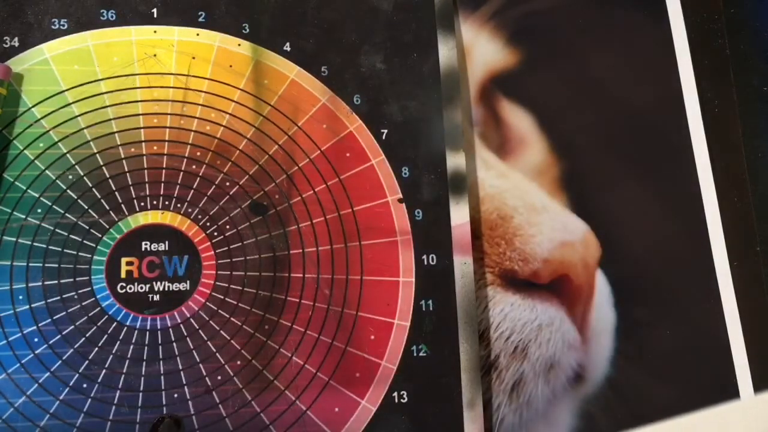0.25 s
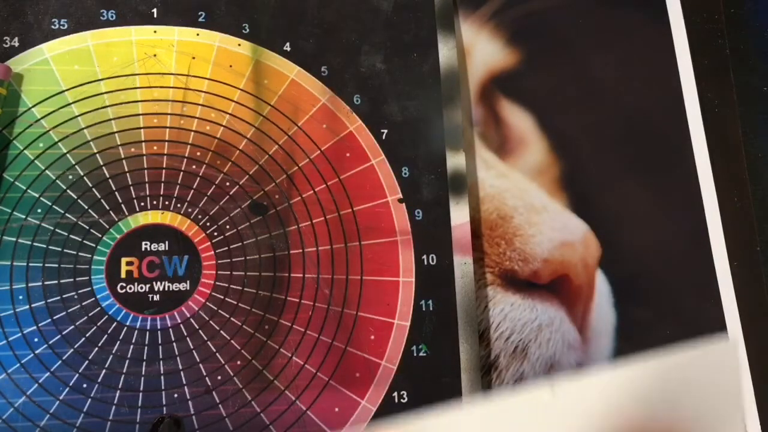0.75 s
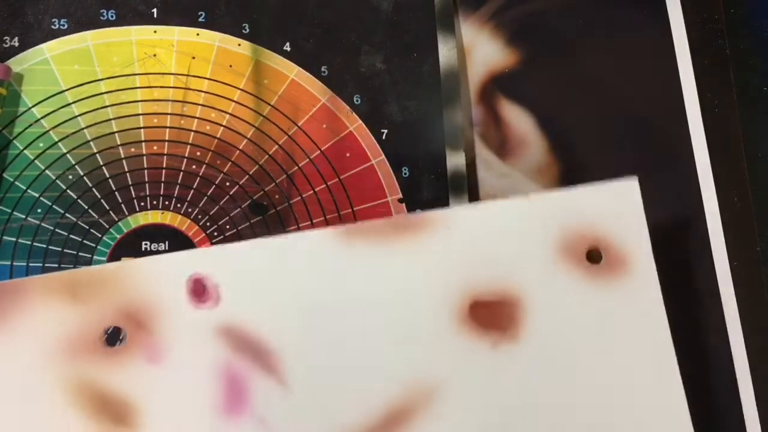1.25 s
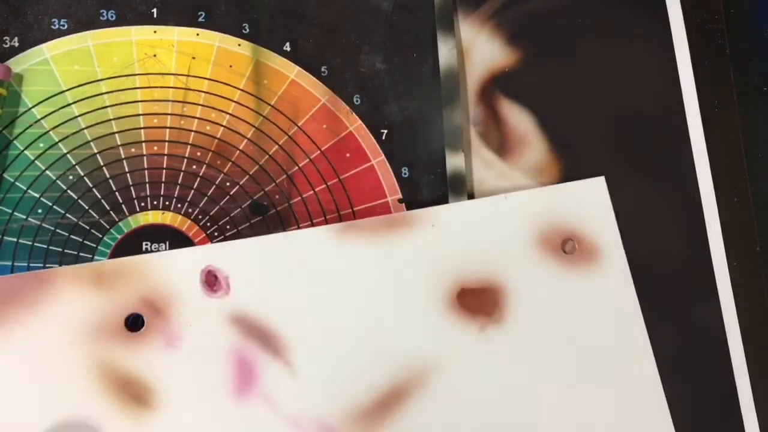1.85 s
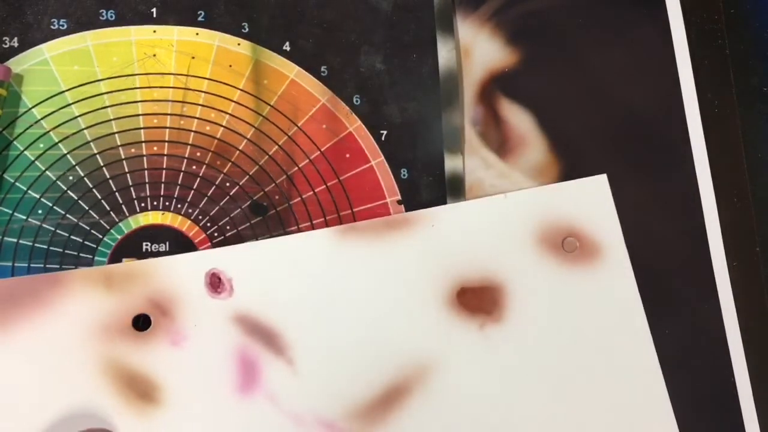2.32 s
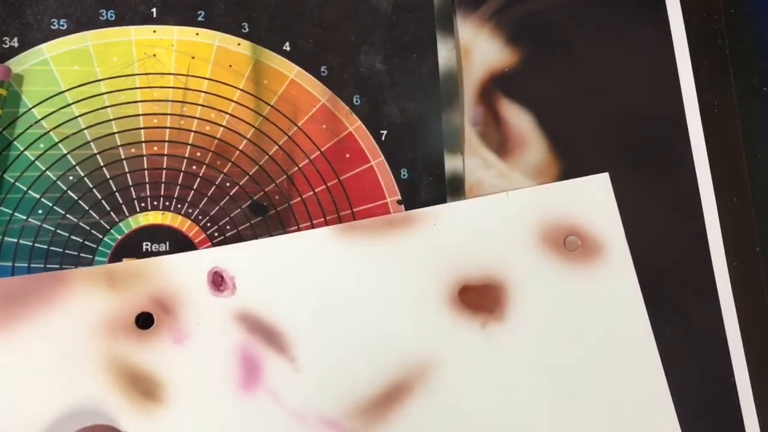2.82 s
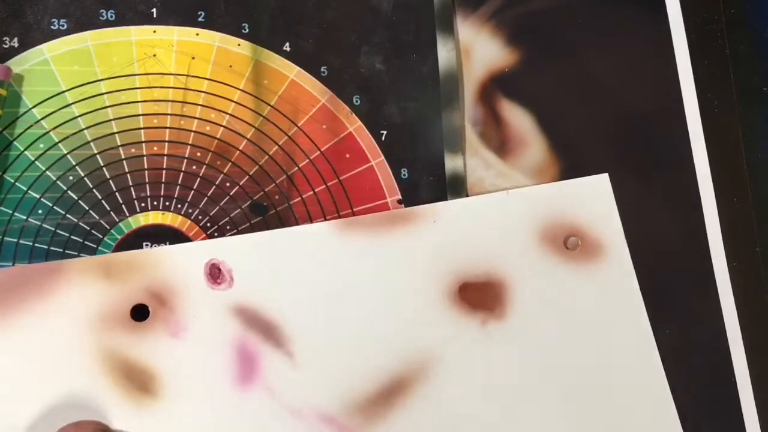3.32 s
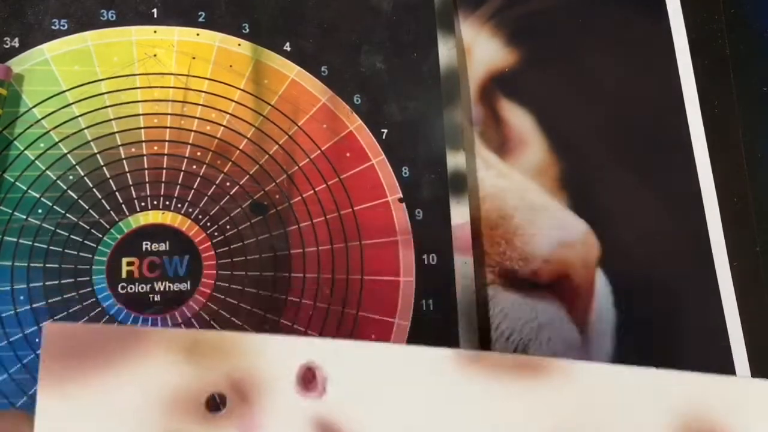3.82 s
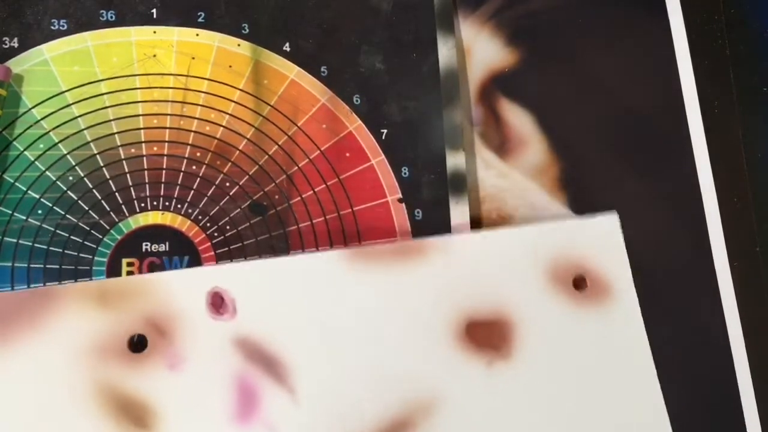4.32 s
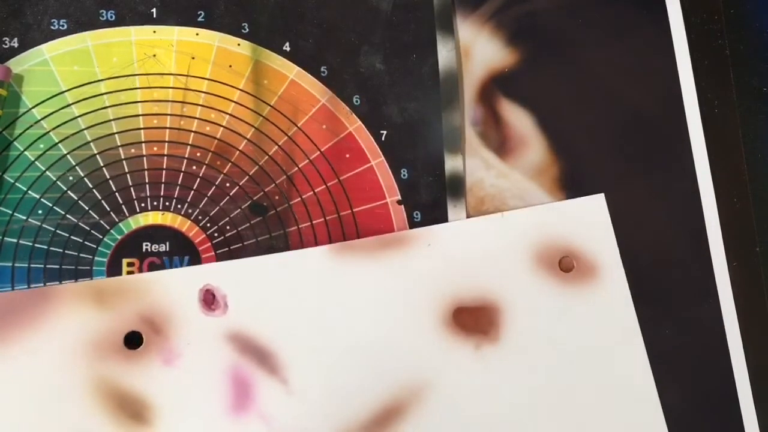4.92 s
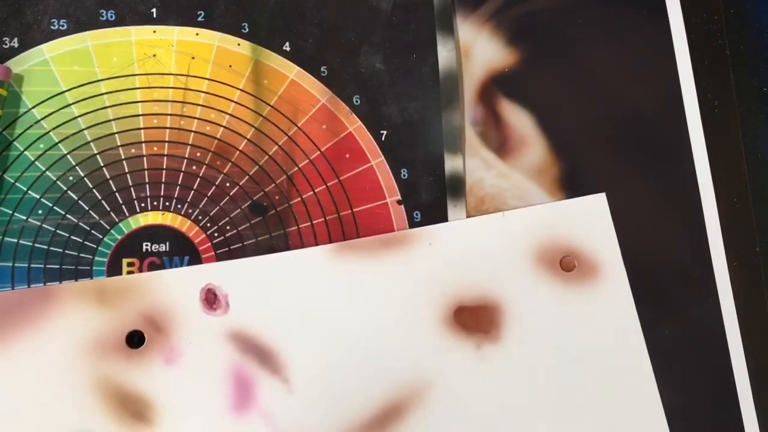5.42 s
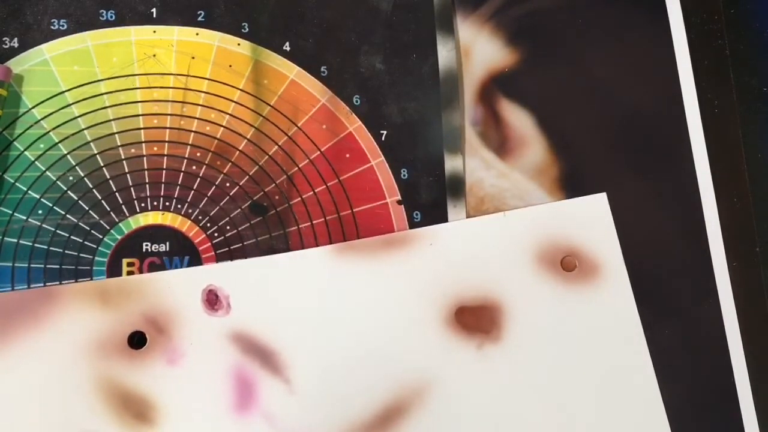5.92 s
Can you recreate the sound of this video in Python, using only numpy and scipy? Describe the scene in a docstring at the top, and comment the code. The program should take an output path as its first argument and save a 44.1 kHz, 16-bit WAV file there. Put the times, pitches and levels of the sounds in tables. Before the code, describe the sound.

An airbrush is already spraying at the start, close to the microphone, its jet rushing against a card with a fine, high hiss on top. At about 0.6 seconds it is drawn away and the rushing drops out, leaving the thin hiss, which slowly weakens and shuts off around 1.7 seconds. At about 0.85 seconds the card knocks lightly on a board with a short scrape. From 2 to 3.5 seconds there are only faint, dry paper ticks and finger scuffs as the card is held. Between 3.6 and 3.9 seconds comes a quick cluster of light taps, clicks and scrapes against the board, strongest near 3.8. Two soft, short scrapes follow around 4.3 to 4.5 seconds, then sparse faint ticks until the end at about 6 seconds. The room is quiet and fairly dry, with a faint low rumble throughout.

```python
"""A quiet room with a low rumble. An airbrush jet roars on a nearby surface, is drawn away and hisses
in free air until the trigger shuts. A paper card is then handled: scrapes from sliding friction,
dry paper ticks, finger scuffs and taps that ring a board.
One microphone feeds both channels."""
import sys
import numpy as np
from scipy import signal
from scipy.fft import rfft, irfft, next_fast_len
from scipy.io import wavfile
from scipy.ndimage import uniform_filter1d, map_coordinates

SR = 44100
rng = np.random.default_rng(int(sys.argv[2]) if len(sys.argv) > 2 else 0)


def wav_out(sig):
    """Save sig, one row per channel (or a flat mono array), as 16-bit PCM at SR to the path in sys.argv[1]."""
    wavfile.write(sys.argv[1], SR, np.round(np.clip(np.atleast_2d(sig).T, -1, 1) * 32767).astype(np.int16))


N = 271523
T = np.arange(N) / SR
FRAME_HZ, FRAME_S = np.fft.rfftfreq(1024, 1 / SR), np.arange(N // 256 + 5) * 256 / SR
EVENT_N = 4000
EVENT_S = np.arange(EVENT_N) / SR

# low and high drone: f/Hz, rms waver/Hz
DRONES = [(38.5, 0.9), (58.5, 1.6)]
# low drone: t/s, level/dB
LOW_DRONE_LEVEL = [(0, -48), (.15, -66), (2.1, -63), (2.35, -48.5), (4.6, -50), (6.16, -55)]
# high drone: centre/s, width/s, rise/dB
HIGH_DRONE_SWELLS = [(.3, 0.26, 11), (1.6, 0.39, 9.5), (2.1, 0.64, 4.5), (2.7, .6, 8.5), (3.95, 0.5, 10.5),
                     (5.14, 0.39, 10.5), (5.85, 0.26, 11.5)]
# room resonances: f/Hz, width/Hz, gain/dB
ROOM_MODES = [(50.3, 8.9, -4.5), (91, 21, 1), (107.94, 12, -5), (130.5, 18, -9), (153.6, 15, -3),
              (187.4, 18, -2), (200, 5.2, -3.5), (237.5, 16, -8), (264.5, 23, -15), (296, 82, -23.5),
              (358, 15, -23.5), (545, 100, -27)]
# rumble: t/s, level/dB
RUMBLE_LEVEL = [(0, -53.5), (.58, -55), (.76, -46.5), (1.0, -52), (2.1, -49.5), (2.9, -46.5), (3.4, -48.5),
                (3.8, -46), (4.5, -47.5), (5.4, -48), (5.85, -57), (6.16, -55.5)]
# dull wash: f/Hz, density/dB
WASH_COLOUR = [(200, -17), (330, 3), (550, -1.5), (800, -8.5), (1100, -8), (2000, -28), (4000, -34),
               (15600, -60)]
# wash: t/s, level/dB
WASH_LEVEL = [(.9, -63), (1.8, -68), (3.7, -65), (5.2, -69.5), (6.16, -70.5)]
# wash: centre/s, width/s, rise/dB
WASH_SWELLS = [(2.3, 0.26, 6.5), (2.93, 0.18, 7)]
# card strokes: start/s, length/s, top level/dB, top position/0-1, darkening/(dB/oct)
SCRAPES = [(0.833, 0.12, -43, 0.3, 15), (1.527, 0.048, -53.5, .4, 4), (1.637, 0.12, -52, 0.27, 0.5),
           (1.922, 0.083, -62.5, 0.5, -1.5), (2.17, 0.1, -64, 0.37, 6), (3.386, 0.17, -55.5, 0.21, -1),
           (3.5, .1, -63, 0.76, -2), (3.601, 0.026, -56, .7, 0), (3.629, 0.075, -58, .5, 1),
           (3.712, 0.021, -41, 0, -3), (3.786, 0.046, -43, 0.36, 3.5), (3.848, .035, -60, .5, 6),
           (3.896, 0.026, -62.5, 0.1, -2), (4.311, 0.018, -51.5, 0.43, 1), (4.334, 0.068, -43.5, 0.43, -1),
           (4.459, 0.059, -45.5, 0.7, -1.6)]
# card friction: f/Hz, density/dB
SCRAPE_COLOUR = [(300, -33), (600, -18), (950, -7.5), (1400, -2.5), (1900, -9), (2600, -9.5), (3200, -15),
                 (4900, -18.5), (7020, -14), (10500, -24), (15600, -24)]
# finger scratches: t/s, peak/dB, f/Hz, t60/s
SCUFFS = [(3.206, -62, 3800, 0.046), (3.219, -58, 3800, .04), (3.393, -50.5, 3870, .03),
          (3.402, -52.5, 3680, 0.14), (3.859, -61, 4100, .03), (4.130, -58, 4200, 0.023)]
# paper ticks: t/s, body peak/dB, body f/Hz, treble peak/dB
TICKS = [(1.761, -60, 1800, -61.5), (1.7914, -54, 1730, -63), (1.9045, -54, 1570, -59),
         (2.6254, -59.5, 1403, -61.5), (2.6559, -63, 1610, -53), (2.7582, -53, 1610, -54),
         (2.8433, -63, 1710, -60), (2.9244, -55, 1520, -62.5), (3.1413, -54, 1620, -60.5),
         (3.221, -56.5, 1600, -70), (3.272, -55.5, 1560, -55), (3.394, -59, 1990, -57.5),
         (3.4947, -56, 1810, -65), (3.5563, -52, 1600, -60), (3.591, -50, 2310, -63),
         (3.6531, -50, 2000, -64), (3.6687, -50, 2400, -52), (3.7037, -37, 2440, -48),
         (3.7554, -40, 1660, -47), (3.8354, -53, 1520, -58), (3.9194, -64, 1440, -55),
         (4.0775, -57, 1440, -53), (4.1959, -55.5, 1400, -56.5), (4.2094, -58.5, 1480, -53),
         (4.453, -53, 1450, -53), (4.5274, -63, 2370, -53), (4.5523, -61.5, 1695, -47),
         (4.6584, -63.5, 1560, -55), (4.7173, -58, 1430, -54), (4.8084, -59.5, 2100, -56.5),
         (5.0393, -62, 1800, -59), (5.9294, -62, 1594, -58), (6.014, -63, 1660, -56)]
# faint random ticks: t/s, rate/(1/s)
CRACKLE_RATE = [(0, 8), (3.0, 8), (3.5, 50), (4.0, 25), (5.0, 4), (6.16, 2)]
# blows on the board: t/s, peak/dB, tick re peak/dB, softness/(dB/oct), t60 factor of the grip
TAPS = [(0.846, -24.5, -15, -1.5, 1.3), (0.853, -24.5, -24, 7.5, 1.5), (0.860, -25, -24, 12, 0.88),
        (3.624, -29.5, -5.5, -7, 0.69), (3.691, -39, 1, -5, 0.94), (3.712, -27.5, -15, -15, 0.48),
        (3.773, -31, -16, 5, 1.6), (3.780, -22, -6.5, 2.5, 1.45), (3.785, -24, -22, 10, 1.4),
        (3.801, -32.5, -17, 18, 1.3), (3.901, -46, -12, 14, 1.4)]
# board resonances: f/Hz, gain/dB, t60/s
BOARD_MODES = [(262, -9, 0.044), (451, -13, 0.074), (939, -7, 0.064), (1215, -0.5, 0.024),
               (1490, -3, 0.0099), (1820, -9.5, 0.018), (2413, -3.5, 0.014), (3500, -19, 0.011)]
# air leaving the nozzle until the trigger shuts: t/s, level/dB
NOZZLE_LEVEL = [(0, -21), (.518, -20), (.722, -25), (.862, -22.5), (.95, -25), (1.074, -26.5), (1.338, -31),
                (1.7, -34)]
# nozzle hiss: f/Hz, density/dB
NOZZLE_COLOUR = [(290, -56.5), (500, -33.5), (603, -23), (667, -33), (1030, -25.5), (4860, -15.5),
                 (9020, -8.5), (10400, -6), (14100, 1.5), (15600, -2)]
# jet on the surface, held, then drawn away: t/s, level/dB
ROAR_LEVEL = [(0, -18), (.088, -18), (.226, -21), (.478, -18.5), (.596, -23), (.672, -39), (.694, -36),
              (.744, -58), (.8, -84)]
# jet roar: f/Hz, density/dB
ROAR_COLOUR = [(200, -31), (450, -16), (650, -5.5), (1020, -2), (1500, -4.5), (2070, 1), (2250, -3),
               (3300, -4.5), (4300, -10), (6050, -7.5), (6900, -12.5), (8000, -19.5), (11000, -34.5)]
# notches from an echo of opposite sign: f/Hz, width/Hz, depth/dB
ROAR_HOLLOWS = [(1223, 71, 18), (2520, 200, 5.5), (4000, 390, 3)]
# microphone self-noise: f/Hz, density/dB
MIC_HISS_COLOUR = [(710, -24), (1200, 1.5), (1840, -4.5), (3180, -6), (4840, -11), (5930, -6),
                   (7680, -10.5), (9210, -8.5), (15600, -4.5)]
# microphone notches: f/Hz, width/Hz, depth/dB
MIC_DIPS = [(4987, 370, 4), (7850, 400, 3.5), (10400, 600, 5.5)]


def gain_of(db):
    """Decibels to amplitude."""
    return 10 ** (np.asarray(db) / 20)


def unit_rms(x):
    """Scale to rms 1."""
    return x / np.sqrt(np.mean(x ** 2) + 1e-20)


def curve(points):
    """Breakpoints interpolated per sample."""
    return np.interp(T, *np.transpose(points))


def swells_db(table):
    """Sum of bell-shaped rises."""
    return sum(db * np.exp(-(2 * (T - s) / width_s) ** 2) for s, width_s, db in table)


def flutter(depth_db, samples):
    """Random gain, smoothed over a sample count."""
    return gain_of(depth_db * unit_rms(uniform_filter1d(rng.standard_normal(N), samples)))


def dips(x, table):
    """Cut narrow bands."""
    size = next_fast_len(len(x) + SR // 4)
    hz = np.fft.rfftfreq(size, 1 / SR)
    cut_db = sum(db / (1 + (2 * (hz - f) / width) ** 2) for f, width, db in table)
    return irfft(rfft(x, size) * gain_of(-cut_db), size)[:len(x)]


def noise(colour, patchy_db, dark_db_oct=0., pivot_hz=1000):
    """Coloured noise with drifting spectral patches, tilted about a pivot."""
    real, imag, patches = rng.standard_normal((len(FRAME_S), 513, 3)).T
    patches = unit_rms(uniform_filter1d(uniform_filter1d(patches, 10, axis=0), 10, axis=1))
    hz, db = np.transpose(colour)
    shape = gain_of(np.interp(np.log(FRAME_HZ + 1), np.log(hz + 1), db))[:, None]
    octaves = np.log2(np.maximum(FRAME_HZ[:, None], 350) / pivot_hz)
    drift = gain_of(patchy_db * patches - octaves * dark_db_oct)
    x = signal.istft((real + 1j * imag) * shape * drift, nperseg=1024, noverlap=768)[1][:N]
    return x / np.sqrt(np.mean(shape ** 2)) * 16 * np.sqrt(3 / 2) / 512


def shaped_noise(rows, colour, patchy_db, pivot_hz):
    """Noise following rows of t/s, level/dB, darkening/(dB/oct); silent outside them."""
    s, db, dark_db_oct = np.transpose(rows)
    envelope = gain_of(np.interp(T, s, db, left=-120, right=-120))
    return envelope * noise(colour, patchy_db, np.interp(FRAME_S, s, dark_db_oct), pivot_hz)


def crack(peak_db, low_hz, high_hz, t60_s):
    """Decaying band-limited noise burst."""
    burst = rng.standard_normal(EVENT_N) * gain_of(-60 * EVENT_S / t60_s)
    x = signal.lfilter(*signal.butter(2, [low_hz, high_hz], "band", fs=SR), burst)
    return gain_of(peak_db) * x / abs(x).max()


def add_at(out, s, event):
    """Mix an event in at time s."""
    span = out[round(s * SR):][:len(event)]
    span += event[:len(span)]


def drone(hz, waver_hz):
    """Deep tone, wavering in pitch and level."""
    waver = unit_rms(uniform_filter1d(uniform_filter1d(rng.standard_normal(N), 4000), 4000))
    phase = 2 * np.pi * np.cumsum(hz + waver_hz * waver) / SR
    return np.sqrt(2) * np.sin(phase) * flutter(depth_db=2.6, samples=2500)


def rumble():
    """Noise held in the room's modes."""
    hz = np.fft.rfftfreq(N, 1 / SR)
    modes = sum(gain_of(db) / (1 + (2 * (hz - f) / width) ** 2) for f, width, db in ROOM_MODES)
    return gain_of(curve(RUMBLE_LEVEL)) * unit_rms(irfft(rfft(rng.standard_normal(N)) * modes, N))


def room():
    """Two drones, modal rumble and a dull wash above."""
    low = gain_of(curve(LOW_DRONE_LEVEL)) * drone(*DRONES[0])
    high = gain_of(-58 + swells_db(HIGH_DRONE_SWELLS)) * drone(*DRONES[1])
    wash = noise(WASH_COLOUR, patchy_db=3, dark_db_oct=-1.7, pivot_hz=550)
    return low + high + rumble() + gain_of(curve(WASH_LEVEL) + swells_db(WASH_SWELLS)) * wash


def walls(x, t60_s=.09, gap_s=.003, cutoff_hz=4000):
    """Short, dull tail of sparse wall echoes."""
    echoes = rng.choice([-1., 1.], EVENT_N) * (rng.random(EVENT_N) < .05) * (EVENT_S > gap_s)
    tail = signal.lfilter(*signal.butter(1, cutoff_hz, fs=SR), echoes * gain_of(-60 * EVENT_S / t60_s))
    return signal.oaconvolve(x, tail / np.linalg.norm(tail))[:N]


def scrapes(start_db=-8.5, end_db=-29.5, roundness=1.44, dulling_db_oct=6.3):
    """Card friction on fingers and board; each stroke rises, then falls and dulls."""
    ramp, rows = np.linspace(0, 1, 7), []
    for s, length_s, db, position, dark in SCRAPES:
        top_s, end_s = s + np.clip(position, .05, .95) * length_s, s + length_s
        rise_db = db + start_db * (1 - ramp) ** roundness
        fall_db = db + end_db * ramp ** roundness
        rows += zip(s + (top_s - s) * ramp, rise_db, np.full_like(ramp, dark))
        rows += zip(top_s + (end_s - top_s) * ramp, fall_db, dark + dulling_db_oct * ramp)
        rows += [(s - .002, -120, dark), (end_s + .002, -120, dark)]
    friction = shaped_noise(sorted(rows), SCRAPE_COLOUR, patchy_db=.5, pivot_hz=1720)
    return friction * flutter(depth_db=.92, samples=60)


def scuffs(edge_ratio=1.14):
    """Narrow-band scratches of a finger on the card."""
    out = np.zeros(N)
    for s, db, hz, t60_s in SCUFFS:
        add_at(out, s, crack(db, hz / edge_ratio, hz * edge_ratio, t60_s))
    return out


def ticks(t60_s=.016, crackle_db=-65):
    """Dry paper ticks and faint random crackle, each a body and a shorter treble crack."""
    times_s = T[rng.random(N) < curve(CRACKLE_RATE) / SR]
    peaks_db = crackle_db + 2.5 * np.minimum(rng.exponential(size=len(times_s)), 2.5)
    crackle = [(s, db, 2200 * 2 ** rng.uniform(-.54, 1), db - 1) for s, db in zip(times_s, peaks_db)]
    out = np.zeros(N)
    for s, body_db, hz, treble_db in list(TICKS) + crackle:
        add_at(out, s, crack(body_db, hz / 5, hz * 2, t60_s))
        add_at(out, s, crack(treble_db, 5000, 14000, .68 * t60_s))
    return out


def taps(contact_t60_s=.01):
    """Brief noisy contacts tick and ring the board's modes; softer blows ring less treble."""
    out = np.zeros(N)
    for s, db, tick_db, soft_db_oct, grip in TAPS:
        ring = np.zeros(EVENT_N)
        for hz, mode_db, t60_s in BOARD_MODES:
            onset_db = mode_db - soft_db_oct * np.log2(max(hz, 900) / 900)
            ring += gain_of(onset_db - 60 * EVENT_S / (t60_s * grip)) * np.sin(2 * np.pi * hz * EVENT_S)
        contact = rng.standard_normal(EVENT_N) * gain_of(-60 * EVENT_S / contact_t60_s)
        rattle = signal.oaconvolve(contact, ring)[:EVENT_N]
        add_at(out, s, gain_of(db) * rattle / abs(rattle).max())
        add_at(out, s, crack(db + tick_db, 2200, 22000, t60_s=.011))
    return out


def surface_echo(hiss, away_s, near_ms=.4, ms_per_s=3.4, share=.12, fade_s=.3):
    """Echo off the surface; as the nozzle leaves, it fades and its delay sweeps a comb downwards."""
    gone_s = np.maximum(T - away_s, 0)
    delay_ms = near_ms + ms_per_s * gone_s
    index = np.maximum(np.arange(N) - delay_ms * SR / 1000, 0)
    return share * np.exp(-(gone_s / fade_s) ** 2) * map_coordinates(hiss, [index], order=3)


def nozzle(away_s=.55, shut_s=.044, shut_drop_db=21, dribble_s=.084, dribble_drop_db=16):
    """Fine hiss of escaping air; the valve closes and the last air dribbles out."""
    near_db_oct, far_db_oct, shut_db_oct = -3.5, -.8, 6.5  # darkening
    end_s, end_db = NOZZLE_LEVEL[-1]
    rows = [(s, db, np.interp(s, [0, away_s], [near_db_oct, far_db_oct])) for s, db in NOZZLE_LEVEL]
    rows += [(end_s + .35 * shut_s, end_db, far_db_oct),
             (end_s + shut_s, end_db - shut_drop_db, shut_db_oct),
             (end_s + shut_s + dribble_s, end_db - shut_drop_db - dribble_drop_db, shut_db_oct)]
    hiss = shaped_noise(rows, NOZZLE_COLOUR, patchy_db=1.47, pivot_hz=11700)
    hiss *= flutter(depth_db=.33, samples=300)
    return hiss + surface_echo(hiss, away_s)


def jet_roar(full_db=-20, darken_per_db=.58, darkest_db_oct=12):
    """Turbulence of the jet striking the surface; dulls as it weakens."""
    rows = [(s, db, np.clip(darken_per_db * (full_db - db), 0, darkest_db_oct)) for s, db in ROAR_LEVEL]
    roar = shaped_noise(rows, ROAR_COLOUR, patchy_db=.75, pivot_hz=1500)
    return dips(roar * flutter(depth_db=1.1, samples=300), ROAR_HOLLOWS)


def scene():
    """Close airbrush and card, their wall echoes and the room."""
    near = jet_roar() + nozzle() + scrapes() + taps() + ticks() + scuffs()
    return np.tile(near + gain_of(-17) * walls(near) + room(), (2, 1))


def record(dry, low_hz=30, high_hz=15760, hiss_db=-67.5):
    """Bass cut, microphone dips and self-noise, band limit."""
    bassless = signal.sosfilt(signal.butter(4, low_hz, "high", fs=SR, output="sos"), dry[0])
    mono = dips(bassless, MIC_DIPS) + gain_of(hiss_db) * noise(MIC_HISS_COLOUR, patchy_db=.6)
    lowpass = signal.firwin(1023, high_hz, window=("kaiser", 9), fs=SR)
    return np.tile(signal.oaconvolve(mono, lowpass, "same"), (2, 1))


dry = scene()
out = record(dry)
wav_out(out)
```